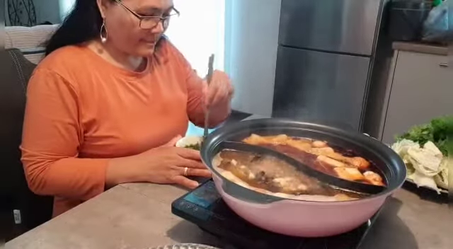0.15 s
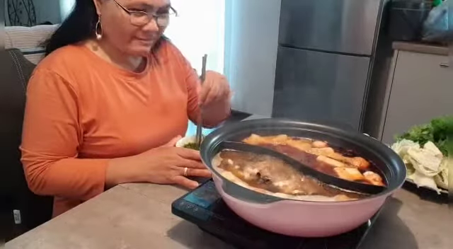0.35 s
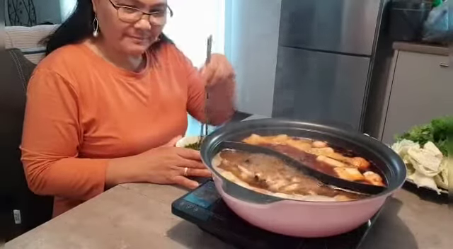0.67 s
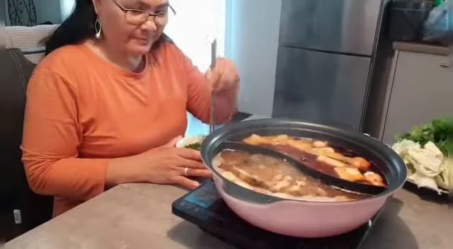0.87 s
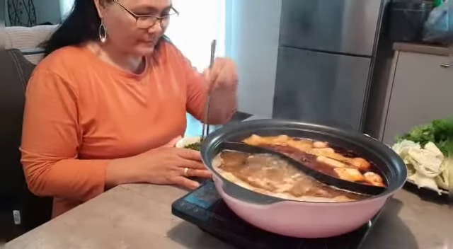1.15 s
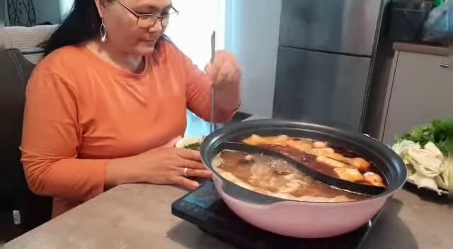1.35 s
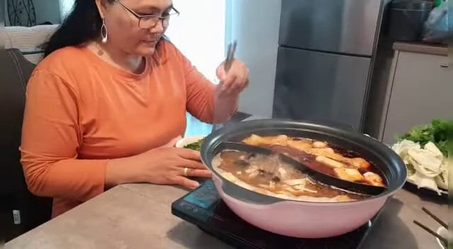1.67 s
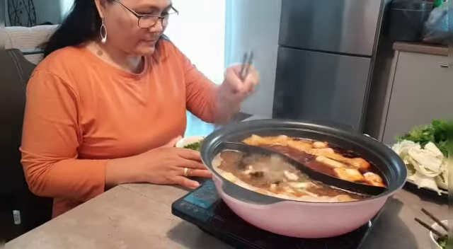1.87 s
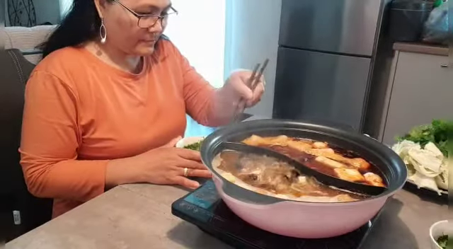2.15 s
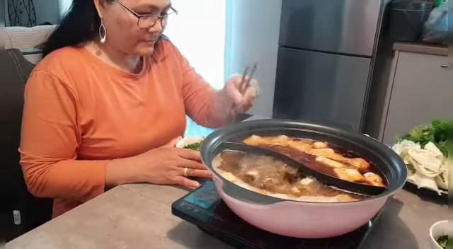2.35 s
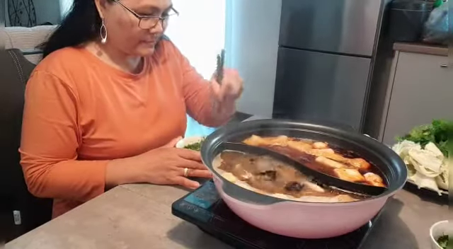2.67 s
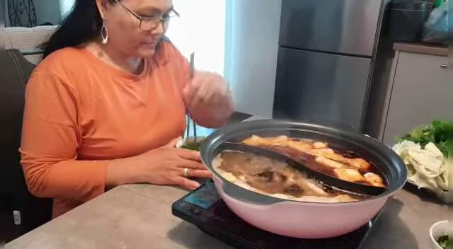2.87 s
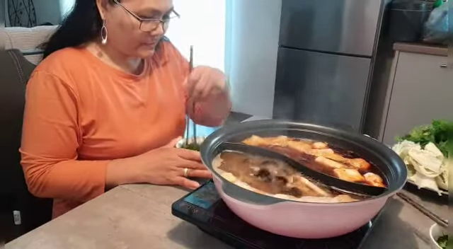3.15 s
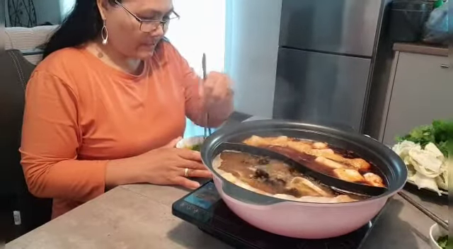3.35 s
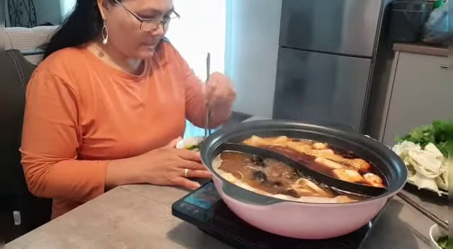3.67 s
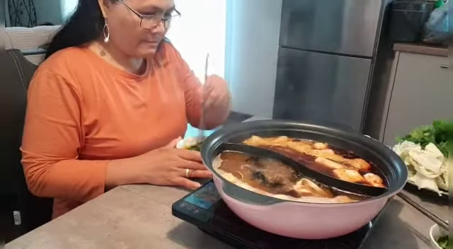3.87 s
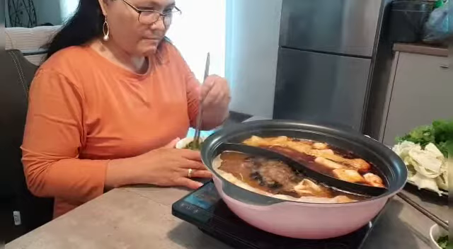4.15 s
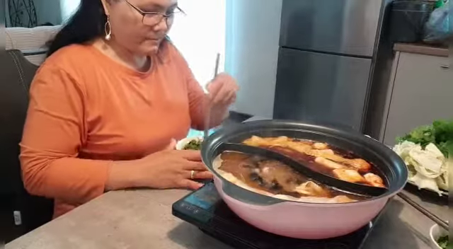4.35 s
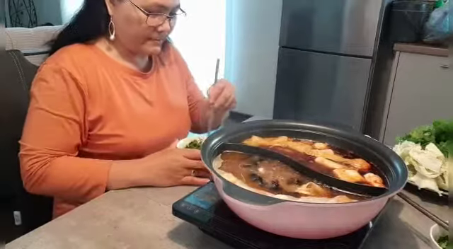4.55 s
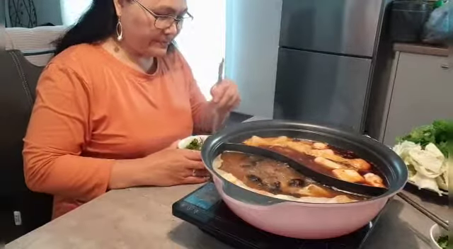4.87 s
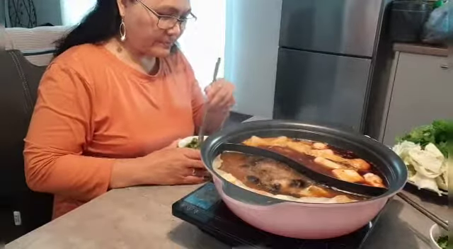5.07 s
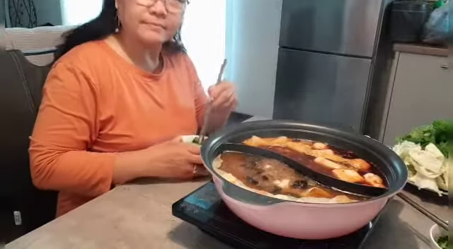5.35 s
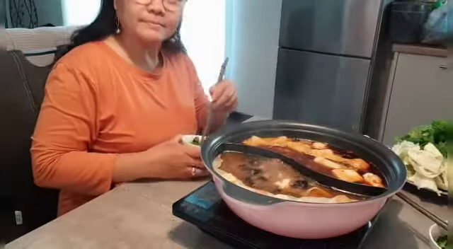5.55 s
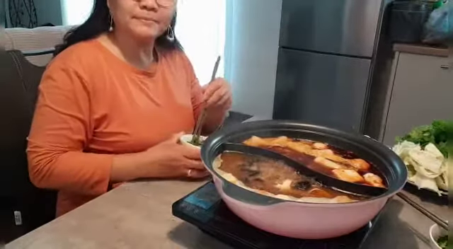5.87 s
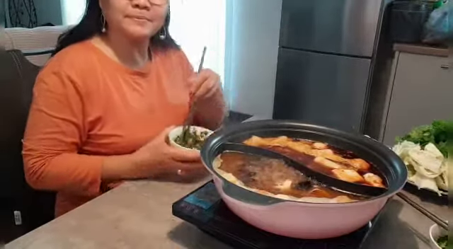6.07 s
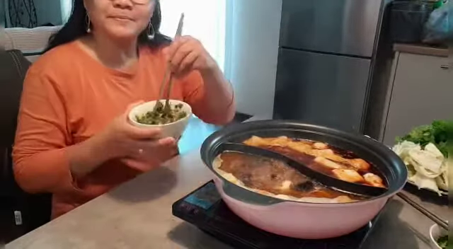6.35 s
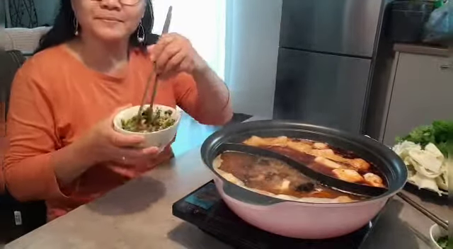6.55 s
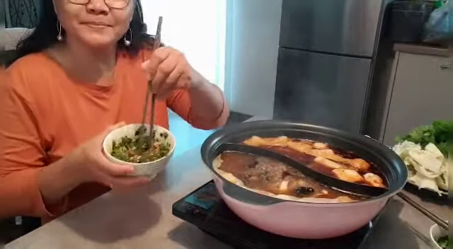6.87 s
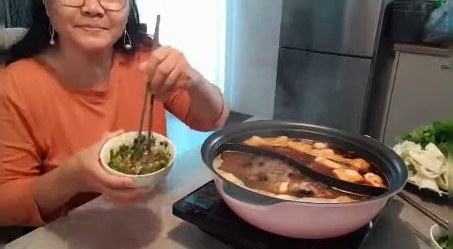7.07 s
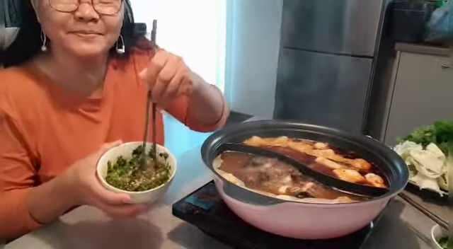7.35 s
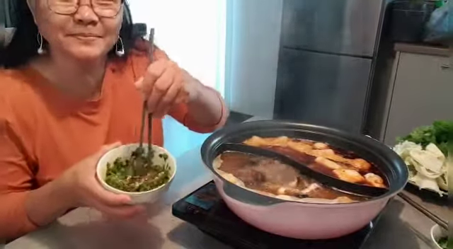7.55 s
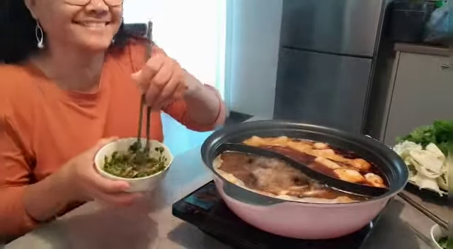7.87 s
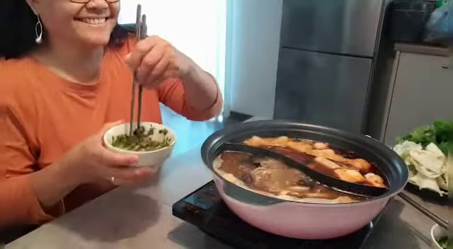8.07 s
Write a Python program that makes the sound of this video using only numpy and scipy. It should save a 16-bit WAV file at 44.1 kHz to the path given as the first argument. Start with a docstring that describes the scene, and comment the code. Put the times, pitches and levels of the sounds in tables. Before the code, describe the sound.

Heavy knocks thud on a table over a cooker's steady hum, then chopsticks clink on a bowl and rustle through chopped herbs.

```python
"""A table-top cooker hums and whirs in a small kitchen; three heavy knocks soon land on the table, lighter ones later.
Chopsticks clink and tick on a small bowl, scuff it, then rustle as they stir chopped herbs.
Knocks are springy pushes and cracks that set off table modes, early echoes and the room; the bowl and
the sticks are decaying modes with snaps of noise; stirring is noise broken into slips, with tiny rings of grit.
The cooker is coloured noise, wandering tones and a mains hum. Two microphones share the bass more than the treble."""
import sys
import numpy as np
from scipy import signal
from scipy.fft import rfft, irfft, next_fast_len
from scipy.io import wavfile

SR = 44100
rng = np.random.default_rng(int(sys.argv[2]) if len(sys.argv) > 2 else 0)


def store_pcm(level_fs):
    """Save levels as 16-bit WAV."""
    pcm = np.round(np.clip(level_fs, -1, 1) * 32767).astype(np.int16)
    wavfile.write(sys.argv[1], SR, np.atleast_2d(pcm).T)


N = 362502
T = np.arange(N) / SR   # seconds

# Colour of the kitchen's echo. Each row: frequency in Hz, level in dB.
KITCHEN_COLOUR = [(30, -22), (70, -11), (130, 0), (300, 6.5), (700, 0), (1500, -1.5), (2200, -0.5),
                  (3000, -3), (5000, -10), (9000, -11), (16000, -49.5)]
# How alike the two microphones hear a sound. Each row: frequency in Hz, likeness (1 is identical).
MIC_LIKENESS = [(130, 0.95), (300, 0.8), (640, 0.3), (1400, 0.12), (3100, 0.013), (7000, 0.015)]
# Strokes of the chopsticks. Each row: start in seconds, length in seconds, relative levels of crisp rustle
# and of rubbing in dB.
STIR_STROKES = [(1.923, 0.11, -60, -64), (4.508, 0.3, -42.5, -47), (4.767, 0.16, -43, -45.5),
                (5.043, 0.1, -51.5, -57), (5.486, 0.12, -49, -48.5), (5.639, 0.19, -40, -40.5),
                (6.107, 0.08, -43.5, -43.5), (6.264, 0.069, -44, -44.5), (6.596, 0.13, -52.5, -46),
                (6.996, 0.05, -39, -39.5), (7.06, 0.18, -30.5, -36.5), (7.266, 0.13, -34, -38),
                (7.545, 0.24, -34, -41.5), (7.878, 0.23, -40, -44.5)]
# every stroke swells, holds and dies away alike
STROKE_ATTACK_S, STROKE_T60_S = 0.047, 0.36


def from_db(db):
    """Decibels to gain."""
    return 10 ** (np.asarray(db) / 20)


def rms_one(x):
    """Scale to unit power."""
    return x / np.sqrt(np.mean(x ** 2) + 1e-20)


def in_time(rows):
    """Each column of a curve at every sample."""
    s, *columns = np.transpose(rows)
    return [np.interp(T, s, c) for c in columns]


def at_hz(points, hz):
    """Read a table on a log-frequency axis."""
    f, value = np.transpose(points)
    return np.interp(np.log(hz + 1), np.log(f), value)


def cut(x, hz, kind, order=2):
    """Causal low-pass or high-pass."""
    sos = signal.butter(order, min(hz, .45 * SR), kind, fs=SR, output="sos")
    return signal.sosfilt(sos, x)


def band(x, low_hz, high_hz, low_order=2):
    """High-pass, then low-pass."""
    return cut(cut(x, low_hz, "high", low_order), high_hz, "low")


def dying(t60, size):
    """Exponential decay by 60 dB in t60 seconds."""
    return np.exp(-np.log(1000) * T[:size] / t60)


def air_noise(colour, size=N, ripple_db=0):
    """Diffuse noise at two microphones, as alike at each frequency as the likeness table says; rms 1."""
    padded = next_fast_len(size, True)
    hz = np.fft.rfftfreq(padded, 1 / SR)
    mid, side = rfft(rng.standard_normal((2, padded)))
    alike = np.clip(at_hz(MIC_LIKENESS, hz), -1, 1)
    pair = np.sqrt(1 + alike) * mid + np.sqrt(1 - alike) * side * [[1], [-1]]
    # reflections from nearby surfaces leave fine, steady peaks and dips in the spectrum
    grid = np.geomspace(450, 16000, 220)
    ripple = np.interp(hz, grid, rng.standard_normal(len(grid)), left=0)
    shape = from_db(at_hz(colour, hz) + ripple_db * ripple)
    return rms_one(irfft(pair * shape, padded)[:, :size])


def tail(colour, t60, size=SR):
    """Dense reflections as a dying-noise response of unit energy per microphone on average."""
    return rms_one(air_noise(colour, size) * dying(t60, size)) / np.sqrt(size)


def ringing(modes, size=SR):
    """Struck modes as decaying sines; the higher ones reach the two microphones out of step."""
    out = 0
    for k, (hz, db, t60) in enumerate(modes):
        alike = np.clip(at_hz(MIC_LIKENESS, hz), -1, 1)
        skew = np.arccos(alike) / 2 * rng.choice([-1, 1])
        wave = np.sin(2 * np.pi * hz * T[:size] + skew * np.array([[1], [-1]]))
        out = out + (-1) ** k * from_db(db) * dying(t60, size) * wave
    return out


def uneven(modes, spread_db):
    """Each blow lands on another spot and shares its force among the modes in its own way."""
    return [(hz, db + spread_db * rng.standard_normal(), t60) for hz, db, t60 in modes]


def through(x, response):
    """Pass a sound through a response."""
    return signal.fftconvolve(np.atleast_2d(x), response, axes=1)[:, :x.shape[-1]]


def spaced(x, lag_ms):
    """The left microphone hears a sound later (positive lag) or earlier than the right."""
    t = T[:len(x)]
    delays = [max(side * lag_ms, 0) / 1000 for side in (1, -1)]
    return np.array([np.interp(t - delay, t, x, left=0) for delay in delays])


def panned(x, pan_db):
    """Lean a sound to the left."""
    return x * from_db([[pan_db / 2], [-pan_db / 2]])


def add(out, s, sound):
    """Mix a sound in at its moment."""
    at = round(s * SR)
    out[:, at:at + sound.shape[1]] += sound[:, :N - at]


def knocks(rebound_weight_db=-8.5, rebound_crack_db=-3, shudder_hz=133, ring_db=-44.5,
           clatter_db=-7, clatter_t60=0.075, room_db=-9, room_t60=0.51):
    """A blow makes the table top shudder while the dish rebounds; table, dishes and room ring on."""
    # Heavy and light knocks on the table. Each row: start in seconds, relative force in dB, contact resonance
    # in Hz, crack in dB re force, weight in dB re force, lag of the left microphone in ms, time to the first
    # rebound in seconds, rebound in dB re force, rebound resonance in Hz, shudder in dB re force,
    # shudder length in seconds.
    blows = [(0.4152, 2, 816, -14, -7.5, -0.22, 0.0044, -13, 1000, -19.5, 0.051),
             (0.7705, 6.5, 1460, -11, -12.5, -0.3, .0085, -8.5, 1190, -20, 0.034),
             (1.008, -28.5, 1540, 2, -15, -0.23, 0.0053, -12, 1200, -30, 0.022),
             (1.6125, -14, 403, -18.5, -15, 0.15, 0.0052, -7.5, 1000, -12, 0.025),
             (1.738, -27.5, 740, -36, -11, 0, .0055, -3.5, 398, -9.5, 0.017),
             (4.63, -43.5, 141, -25, 8.5, 0, 0.0073, -18, 140, 4, 0.011),
             (4.831, -33, 202, -14, -2.5, -0.26, 0.0087, -22, 200, -1, 0.012),
             (8.033, -37.5, 129.8, -22.5, -4, .2, 0.0092, -10, 139, 5.5, 0.034)]
    # Table and dishes ring together. Each row: frequency in Hz, relative level in dB, t60 in seconds.
    table_modes = [(135.6, -17, 0.73), (150.6, -16, 0.63), (171, -19, 0.36), (204, -16, 0.17),
                   (261.3, -1.5, 0.34), (293.6, 3, .13), (354.4, 2, 0.35), (381, 6.5, .14),
                   (417, 1.5, 0.42), (498, 4.5, 0.23), (556, -7, .3), (624, -4.5, 0.21), (665, -10, 0.22),
                   (803, 4, 0.1), (880, 11, 0.051), (906, -0.5, 0.23), (983, 5.5, 0.073), (1087, 4, 0.18),
                   (1167, -3.5, .22), (1210, -5, .3), (1288, -2.5, 0.18), (1440, -6, .3), (1580, -3, 0.2),
                   (1706, -18, 0.33), (1665, 2, 0.19), (1998, -4, 0.33), (2080, -18, 0.35),
                   (2190, -2, 0.32), (2453, -2, 0.17), (2640, 0, 0.14)]
    out, t, room = np.zeros((2, N)), T[:SR], tail(KITCHEN_COLOUR, room_t60)
    for (s, db, first_hz, crack_db, weight_db, lag_ms,
         gap_s, rebound_db, rebound_hz, shudder_db, shudder_s) in blows:
        force = np.zeros((1, SR))
        add(force, 0, contact(first_hz, crack_db, weight_db))
        for delay, drop_db in rebounds(gap_s, rebound_db):
            touch = contact(rebound_hz, crack_db + rebound_crack_db, weight_db + rebound_weight_db)
            add(force, delay, from_db(drop_db) * touch)
        swell = np.sin(np.pi * np.minimum(t / shudder_s, 1))
        shudder = from_db(shudder_db) * np.sin(2 * np.pi * shudder_hz * t) * swell
        direct = spaced(force[0] - shudder, lag_ms)
        early = from_db(clatter_db) * through(force, clatter(clatter_t60))
        body = from_db(ring_db) * ringing(uneven(table_modes, spread_db=2.5)) + from_db(room_db) * room
        add(out, s, from_db(db) * (direct + early + through(force, body)))
    return cut(out, 86, "high", order=3)


def contact(hz, crack_db, weight_db, damping=0.65, crack_t60=0.016, crack_hz=4200, weight_hz=200):
    """One touch of a dish on the table: a springy push, a crack and a slow shove."""
    t = T[:SR // 20]
    phase = 2 * np.pi * hz * t
    spring = cut(np.sin(phase) * np.exp(-damping * phase / 2), hz / 4, "high", order=1)
    crack = cut(rng.standard_normal(len(t)), crack_hz, "low") * dying(crack_t60, len(t))
    shove = np.sin(np.minimum(2 * np.pi * weight_hz * t, np.pi))   # half a cycle
    return (from_db(crack_db) * crack - spring - from_db(weight_db) * shove)[None]


def rebounds(gap_s, rebound_db, count=4, loss_db=3.5, shrink=0.94):
    """A dish rocks to rest, each rebound weaker and sooner than the last: (delay s, dB re first blow)."""
    k = np.arange(count)
    return zip(np.cumsum(gap_s * shrink ** k), rebound_db - loss_db * k)


def clatter(t60, lag_ms=0.37, count=24, first_echo_s=0.0027):
    """Separate early echoes off the table top, pot and dishes, each from its own side; unit energy."""
    # Colour of the early clatter. Each row: frequency in Hz, level in dB.
    clatter_colour = [(30, -18), (70, -21), (130, -1.5), (300, 18), (600, 25), (950, 1), (1500, 12),
                      (2500, 10.5), (5000, -1), (9000, -63), (16000, -31)]
    size = SR // 8
    hz = np.fft.rfftfreq(size, 1 / SR)
    echoes = 0
    for when, side, sign in rng.uniform([0, -1, -1], 1, (count, 3)):
        delay = first_echo_s + when * t60 * 2 / 3
        arrival = delay + side * lag_ms / 1000 * np.array([[1], [-1]]) / 2
        # a delay is a phase slope in the spectrum
        echoes = echoes + np.sign(sign) * np.exp(-np.log(1000) * delay / t60 - 2j * np.pi * hz * arrival)
    return rms_one(irfft(echoes * from_db(at_hz(clatter_colour, hz)), size)) / np.sqrt(size)


def clinks(ring_db=-23, rattle_db=-12, rattle_t60=0.16, stick_db=-13, snap_t60=0.019, snap_db=-6,
           wood_db=-19, wood_hz=1700, wood_t60=0.02, room_db=-2, room_t60=0.4):
    """A tip snaps and rattles on the bowl; a held bowl leaves mostly the stick's dry ring, in the room."""
    # Chopsticks on the bowl. Each row: start in seconds, relative level in dB, low-pass brightness in Hz,
    # share of free ringing from 0 to 1.
    strikes = [(3.0383, -25.5, 7500, 0.14), (3.1426, -20, 11200, 0.6), (3.1738, -22, 7500, 0.8),
               (3.2025, -26.5, 7000, 0.5), (3.234, -40.5, 10000, 0.6), (4.6944, -18.5, 14000, 0.1),
               (4.719, -17.5, 14400, 0.15), (6.346, -15.5, 3370, 0.27), (7.9635, -19, 6000, 0)]
    # The bowl. Each row: frequency in Hz, relative level in dB, t60 in seconds.
    bowl_modes = [(1190, -7.5, .16), (1443, -1, 0.13), (2050, -3, 0.15), (2470, -38, .1), (2990, -6, .14),
                  (3366, 11, 0.065), (3450, 5, 0.044), (3590, 8, .1), (3920, 12, .035), (4340, -7, .12),
                  (4500, -1, .04), (4883, -7, .13), (5400, -25, 0.081), (6277, -15, .13), (6438, -14, 0.11),
                  (6659, 5, 0.081), (7250, -6, .08), (8300, -6, .13), (8460, 7, 0.084), (10700, -5, 0.12),
                  (10350, -9, 0.1), (12670, -7, .15), (13150, -7, .11), (14240, -6, .12)]
    # The chopstick's own dry ring. Each row: frequency in Hz, relative level in dB, t60 in seconds.
    stick_modes = [(3800, 2, 0.0058), (4100, -1, 0.019), (4770, 5, 0.015), (6700, -16, .02),
                   (9900, -9, 0.057)]
    out, size = np.zeros((2, N)), SR // 2
    for s, db, bright_hz, free in strikes:
        free = np.clip(free, 0, 1)
        snap = cut(rng.standard_normal((2, size)), 3900, "high", order=3) * dying(snap_t60, size)
        # a loose tip buzzes on the bowl
        rattle = band(rng.standard_normal((2, size)), 3100, 6500, low_order=3) * dying(rattle_t60, size)
        bowl = from_db(ring_db) * ringing(uneven(bowl_modes, spread_db=2.5), size)
        bowl = bowl + from_db(rattle_db) * rattle
        ring = free * bowl + (1 - free) * from_db(stick_db) * ringing(stick_modes, size)
        wood = from_db(wood_db) * woody(wood_hz, wood_t60, size)
        add(out, s, from_db(db) * cut(from_db(snap_db) * snap + ring + wood, bright_hz, "low"))
    touch_second_dish(out)
    echo = tail([(1000, 13.5), (4000, -1.5), (8000, 0.5), (13000, 7), (16000, -4)], room_t60)
    return out + from_db(room_db) * through(out, echo)


def touch_second_dish(out, snap_db=5, snap_t60=0.19):
    """A light touch on a second dish: its modes ring under a burst of mid-range noise."""
    # The touch: start in seconds, relative level in dB.
    dish_touch = (3.527, -44.5)
    # The second dish. Each row: frequency in Hz, relative level in dB, t60 in seconds.
    dish_modes = [(1437, 2, .12), (2466, -3, .08), (2767, -5, .13), (3639, -4, .11), (3930, -3, .1),
                  (5572, -4, .1), (7397, -4, .08), (9448, -13, .1)]
    s, db = dish_touch
    size = SR // 2
    snap = band(rng.standard_normal((2, size)), 700, 4100) * dying(snap_t60, size)
    add(out, s, from_db(db) * (ringing(dish_modes, size) + from_db(snap_db) * snap))


def woody(hz, t60, size, spread=1.5):
    """A dull, quickly dying knock of wood: noise from a factor below to a factor above one pitch."""
    flat = air_noise([(100, 0), (16000, 0)], size)
    return rms_one(band(flat, hz / spread, hz * spread)) * dying(t60, size)


def ticks(tick_t60=0.016, ring_t60=0.015, low_t60=0.029, tick_db=-3, wood_db=-3, stick_db=-20, room_db=-10):
    """Touches damped by the fingers: a sharp top, a woody part, and a brief ring at random pitches."""
    # Dry ticks of the chopstick tips. Each row: start in seconds, relative level in dB,
    # relative level of the woody part in dB re the top, its pitch in Hz.
    touches = [(1.9147, -31, -33, 1500), (2.925, -32, -34, 2930), (3.936, -25, -22, 4000),
               (4.633, -32, 8.5, 1820), (4.690, -26, -8, 4000), (4.708, -13.5, -20, 4000),
               (4.775, -14.5, -17, 940), (4.783, -12.5, -17.5, 930), (4.840, -6.5, -15, 2500),
               (4.874, -27, -2, 900), (4.909, -19.5, -4, 2500), (4.916, -26, -1.5, 1700),
               (4.978, -32, -2, 4000), (5.195, -35, 2.5, 2230), (5.653, -34.5, 5, 1097),
               (5.677, -28.5, -6, 3800), (5.731, -25.5, 0, 3500), (5.787, -12.5, -21, 3500),
               (5.810, -28.5, -2, 3500), (5.852, -33, 3.5, 1090), (6.128, -22, -8.5, 3050),
               (6.137, -17, -10.5, 2500), (6.187, -30, -4, 3220), (6.307, -29, -10, 1500),
               (6.415, -31.5, -6, 5000), (6.671, -35.5, 2.5, 1430), (7.008, -22.5, -5.5, 3000),
               (7.0436, -30, 2, 3500), (7.0655, -30, 2.5, 4500), (7.13, -10, -24, 3000),
               (7.194, -16.5, 0, 1290), (7.225, -22, 2, 1096), (7.3164, -26, 5, 1347),
               (7.593, -31, -12, 1500), (7.610, -18, -10, 4560), (7.643, -22, -1.5, 4000),
               (7.795, -35, 4, 1450), (7.85, -36, 7, 1600), (7.901, -28.5, -1.5, 3500),
               (7.954, -15.5, -10, 1680), (8.038, -28, -7.5, 1420), (8.043, -12.5, -10.5, 1600),
               (8.077, -24.5, 4, 1740)]
    # Where the ticks are heard. Each row: time in seconds, lean to the left in dB.
    tick_pan = [(4.9, 2.5), (5.7, -0.5)]
    out, size = np.zeros((2, N)), SR // 10
    for s, db, low_db, wood_hz in touches:
        top = band(rng.standard_normal((2, size)), 8900, 10500) * dying(tick_t60, size)
        pitches = rng.uniform(3140, 11650, size=8)
        top += ringing([(hz, stick_db, ring_t60) for hz in pitches], size)
        wood = from_db(low_db + wood_db) * woody(wood_hz, low_t60, size)
        lean_db = np.interp(s, *np.transpose(tick_pan))
        add(out, s, from_db(db + tick_db) * panned(top + wood, lean_db))
    return out + from_db(room_db) * through(out, tail(KITCHEN_COLOUR, 0.33))


def stroke(s, length_s):
    """Attack, hold and release of one stroke."""
    attack = np.clip((T - s) / STROKE_ATTACK_S, 0, 1)
    return attack * np.exp(-np.log(1000) * np.clip((T - s - length_s) / STROKE_T60_S, 0, 2))


def grains(per_s, spread_db, t60):
    """Envelope of many tiny slips of uneven size; rms 1."""
    slips = (rng.random(N) < per_s / SR) * from_db(spread_db * np.minimum(rng.exponential(1, N), 4))
    decay = np.exp(-2 * np.log(1000) / (t60 * SR))   # of the power, per sample
    power = signal.lfilter([1], [1, -decay], slips ** 2 + 1e-12)
    return rms_one(np.sqrt(power))


def stirring(crisp_gain_db=-3.5, rub_gain_db=-0.95, direct_db=-4, lag_ms=0.248, catch_db=-11):
    """Leaves crackle between the tips as the chopsticks rub round the bowl, after a faint early rustle as they
    turn in the hand; now and then a tip catches."""
    # Colours of the rustle and of the rubbing. Each row: frequency in Hz, level in dB.
    crisp_colour = [(1200, -46), (2500, -6.5), (3500, 0.5), (5000, 1), (6000, -2.5), (8300, -2), (9800, -1),
                    (12000, -2), (15700, -8)]
    rub_colour = [(35, -22), (70, 5), (130, 0), (250, -2), (500, -6.5), (900, 0), (1500, -4.5), (2500, -15),
                  (4200, -15.5), (7000, -22), (16000, -48)]
    crisp_power, rub_power = 0, 0
    for s, length_s, crisp_db, rub_db in STIR_STROKES:
        effort = stroke(s, length_s)
        crisp_power = crisp_power + (from_db(crisp_db) * effort) ** 2
        rub_power = rub_power + (from_db(rub_db) * effort) ** 2
    fine_slips = grains(per_s=1500, spread_db=-1.5, t60=0.053)
    catches = from_db(catch_db) * grains(per_s=44, spread_db=0.8, t60=0.0083)
    slips = np.hypot(fine_slips, catches)
    direct = from_db(direct_db) * spaced(air_noise(crisp_colour)[0], lag_ms)
    rustle = air_noise(crisp_colour, ripple_db=-3.0) + direct
    crisp = from_db(crisp_gain_db) * np.sqrt(crisp_power) * rustle
    rub = from_db(rub_gain_db) * np.sqrt(rub_power) * air_noise(rub_colour, ripple_db=3.0)
    return panned(slips * (crisp + rub), 0.55)


def grit(per_s=260, spread_db=3.5, cycles=16, tilt_db=4, grit_db=-2, low_hz=900, high_hz=11000, room_db=-8):
    """Tiny bits snap under each stroke (herbs in the bowl; at 1.9 s the chopsticks turning in the hand), each a
    few cycles at its own pitch; low follow rub, high rustle."""
    out = np.zeros((2, N))
    for s, length_s, crisp_db, rub_db in STIR_STROKES:
        bits = rng.random(size=(120, 3))[:round(per_s * length_s)]
        for when, pitch, chance in bits:
            hz = low_hz * (high_hz / low_hz) ** pitch
            level_db = rub_db + pitch * (crisp_db + tilt_db - rub_db)
            db = grit_db + level_db + spread_db * min(-np.log(1 - chance), 3)
            snap = ringing([(hz, db, cycles / hz)], SR // 20)
            add(out, s + STROKE_ATTACK_S + when * length_s, snap)
    return out + from_db(room_db) * through(out, tail(KITCHEN_COLOUR, 0.41))


def scuffs(attack_s=0.014):
    """Brief dry slides: coloured noise that starts quickly and fades."""
    # Each row: start in seconds, relative level in dB, t60 in seconds.
    slides = [(4.298, -33, 0.44), (6.869, -36.5, 0.56), (7.475, -39, 0.94)]
    # Each row: frequency in Hz, level in dB.
    scuff_colour = [(200, -9), (500, 4), (1300, 7), (2400, -8), (3100, -1.5), (4700, 0.5), (5200, 4),
                    (5700, -19), (8000, -12), (16000, -39)]
    out, size = np.zeros((2, N)), SR // 3
    for s, db, t60 in slides:
        shape = np.minimum(T[:size] / attack_s, 1) * dying(t60, size)
        add(out, s, from_db(db) * air_noise(scuff_colour, size, ripple_db=4) * shape)
    return out


def cooker(rush_db=-1.0, tones_db=-1, hiss_db=-1):
    """Fan rush with its tones, a low rumble, mains hum and a thin hiss with a faint whine."""
    # The background sinks and swells: level of the fan's rush, and of a thin hiss that sinks and returns, then
    # stays. # Each row: time in seconds, relative level in dB.
    fan_level = [(0.0, -45), (0.71, -48.5), (1.08, -53.5), (1.88, -51.5), (2.72, -54), (3.39, -47.5),
                 (3.73, -48), (4.67, -45), (5.88, -46.5), (7.21, -46), (7.83, -46.5), (8.22, -46)]
    hiss_level = [(0, -47), (.4, -48.5), (.55, -52.5), (1.1, -58), (1.62, -58), (1.85, -66.5), (3.1, -70),
                  (3.92, -64), (3.96, -57.5), (4.5, -49)]
    # Colours of fan, rumble and hiss. Each row: frequency in Hz, level in dB.
    fan_colour = [(30, -41), (60, -44), (170, -11), (310, 3), (365, -5.5), (480, -3.5), (525, 3.5),
                  (600, -5.5), (1100, -6), (1800, -13), (3000, -25.5), (6000, -43), (16000, -55)]
    rumble_colour = [(20, -24), (35, -38), (66, 9.5), (88, -14.5), (135, 8.5), (165, -3), (300, -9),
                     (1000, -47)]
    hiss_colour = [(1500, -10.5), (3200, 0.5), (4300, -4.5), (5700, -3.5), (7200, 0.5), (8100, 2),
                   (9300, -4), (10400, 1.5), (11000, -3.5), (12300, 2.5), (13600, -15.5), (15800, 6)]
    # Tones of the fan and its casing. Each row: frequency in Hz, width in Hz, relative level in dB.
    fan_tones = [(240.8, 1.3, -11.5), (305.5, 6.3, -11.5), (407, 9, 0), (430, 4.5, -7)]
    # dB at the loudest, and dB lost for each dB that the fan (rumble) or the hiss (hum) loses
    rumble_db, rumble_follows = -52.5, 1.3
    mains_db, mains_follows, mains_hz = -50.5, 1, 100
    # whine: centre and width, dB re the hiss curve's maximum, dB lost for each dB that the hiss loses
    whine_hz, whine_width_hz, whine_db, whine_follows = 13050, 320, -11.5, 1.3

    fan_db, = in_time(fan_level)
    fan_dip_db = fan_db - fan_db.max()
    tones = sum(from_db(db) * whir(hz, width_hz) for hz, width_hz, db in fan_tones)
    rush = from_db(rush_db) * panned(air_noise(fan_colour, ripple_db=2.5), 0.7)
    fan = from_db(fan_db) * (rush + from_db(tones_db) * panned(tones, 3.4))
    rumble = from_db(rumble_db + rumble_follows * fan_dip_db) * air_noise(rumble_colour)

    thin_db, = in_time(hiss_level)
    thin_dip_db = thin_db - thin_db.max()
    hum = np.sqrt(2) * np.sin(2 * np.pi * mains_hz * T)   # rms 1
    mains = from_db(mains_db + mains_follows * thin_dip_db) * hum
    flicker = grains(per_s=5100, spread_db=3.5, t60=0.019)
    hiss = from_db(thin_db + hiss_db) * air_noise(hiss_colour, ripple_db=2.4) * flicker
    whine_pair = np.array([whir(whine_hz, whine_width_hz) for side in "LR"])
    whine = from_db(thin_db.max() + whine_db + whine_follows * thin_dip_db) * whine_pair
    return fan + panned(rumble + mains + hiss + whine, 1.95)


def whir(hz, width_hz):
    """A tone whose phase wanders while its height wavers less than the noise that steers it."""
    # the first second is dropped, so the filter has settled
    real, imaginary = cut(rng.standard_normal((2, N + SR)), width_hz / 2, "low", order=1)[:, SR:]
    wander = real + 1j * imaginary
    return rms_one(np.sqrt(np.abs(wander)) * np.cos(2 * np.pi * hz * T + np.angle(wander)))


def scene():
    """The table, the bowl and the cooker in the kitchen."""
    return panned(knocks(), 1.0) + clinks() + ticks() + stirring() + grit() + scuffs() + cooker()


def record(dry, cutoff_hz=15900):
    """The highest peaks are rounded and the top is cut."""
    rounded = dry / (1 + dry ** 4) ** .25
    return signal.sosfilt(signal.ellip(12, .1, 80, cutoff_hz, fs=SR, output="sos"), rounded)


dry = scene()
out = record(dry)
store_pcm(out)
```